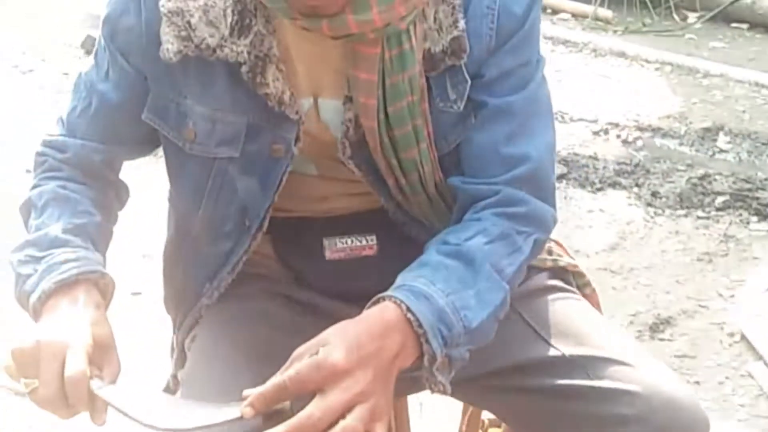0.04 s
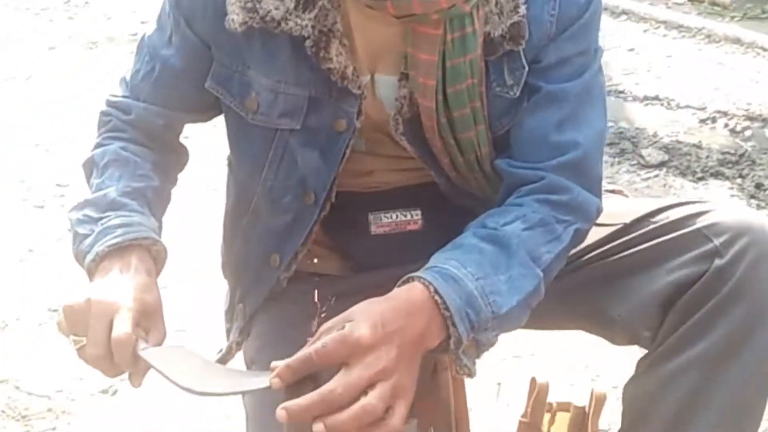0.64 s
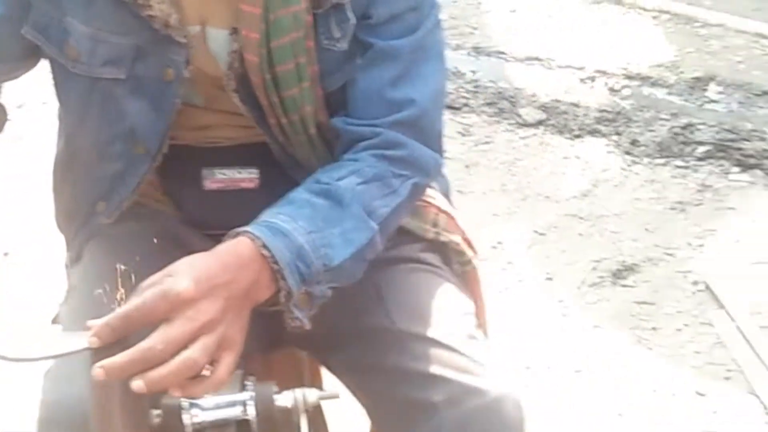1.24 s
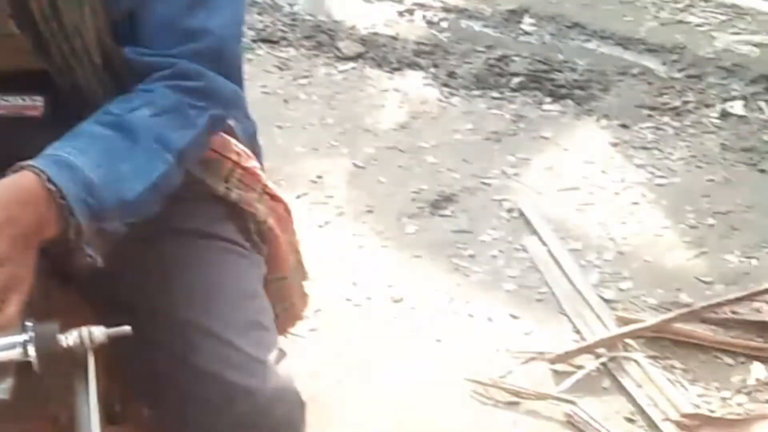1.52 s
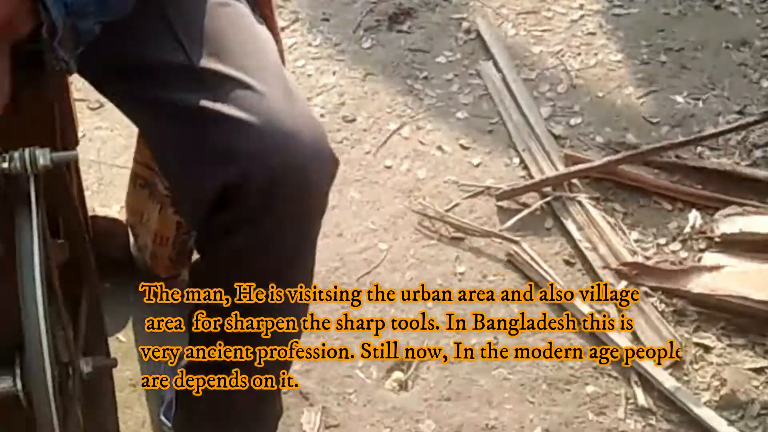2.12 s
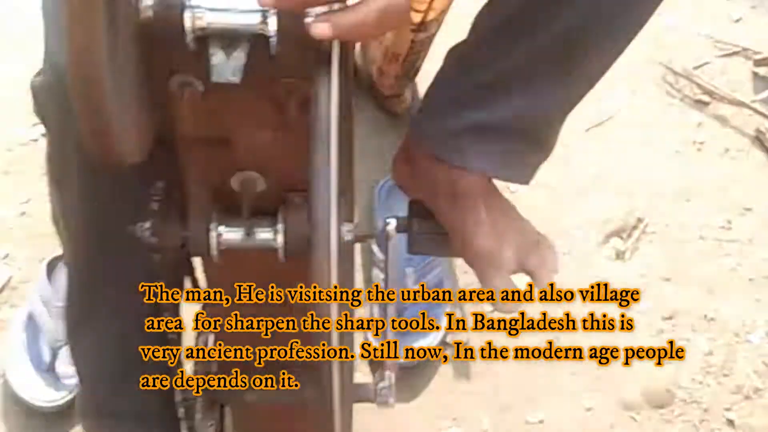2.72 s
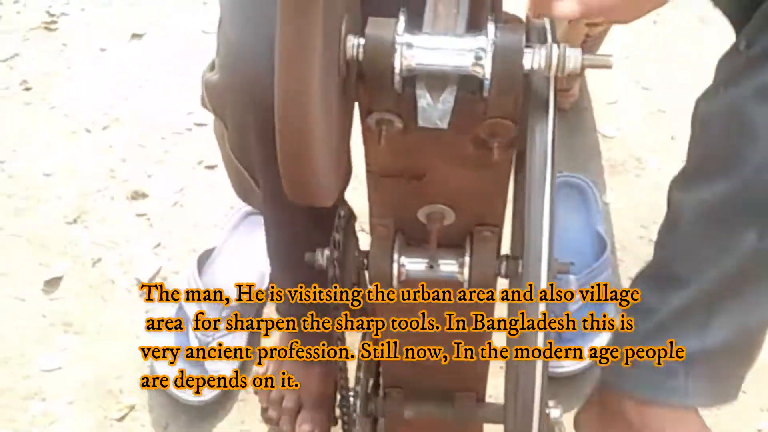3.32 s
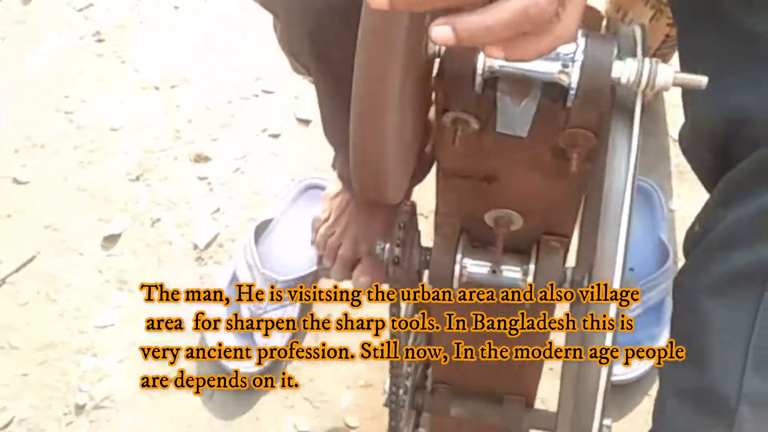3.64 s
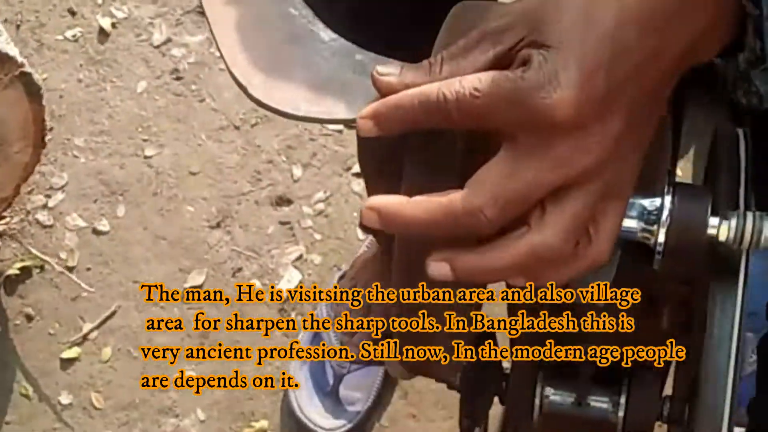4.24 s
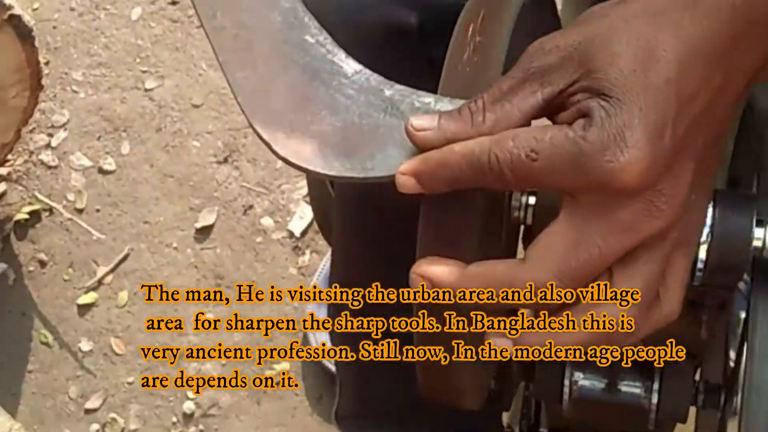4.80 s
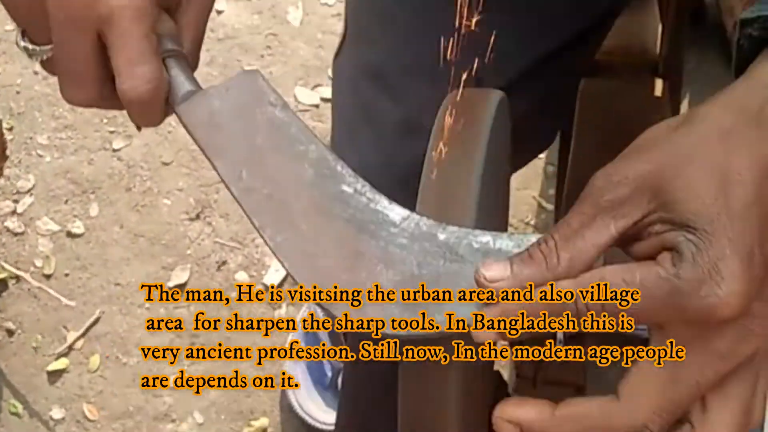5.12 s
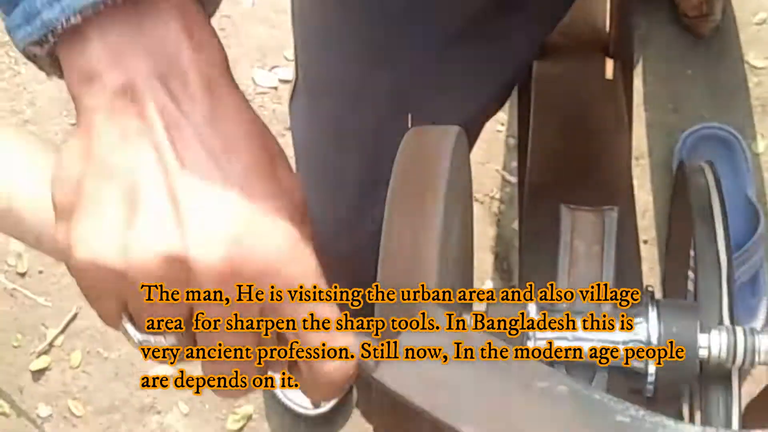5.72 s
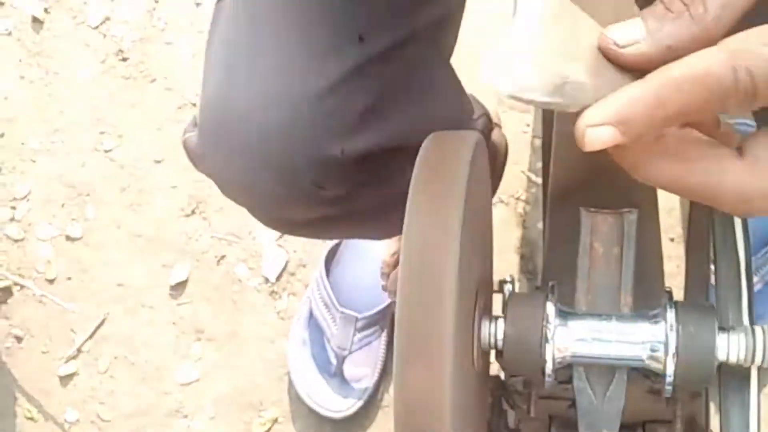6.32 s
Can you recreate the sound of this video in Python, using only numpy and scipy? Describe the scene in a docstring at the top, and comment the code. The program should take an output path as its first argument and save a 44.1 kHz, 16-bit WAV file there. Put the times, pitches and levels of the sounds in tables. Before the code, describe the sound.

A pedal-driven grindstone whirs and rattles close by, outdoors. A steel blade taps the stone a few times, then grinds in a long, gritty pass with a shifting metallic tone. It lifts for about a second while the drive runs on with light knocks. More taps lead into a shorter, louder pass that throbs and judders. The blade comes away, leaving the whir and a few faint squeaks.

```python
"""A curved steel blade is sharpened on a pedal-driven grindstone, outdoors and close by.
Abrasive grains strike the edge and excite bending modes, which swell and glide as the blade is drawn
from heel to tip in two passes. The stone runs slightly out of true, so it first taps the edge, then
grinds with a throb; under the hardest pressure the blade judders and flexes. The drive whirs, rattles
and knocks into its stand, air rumbles faintly, and thin squeaks follow the lifting of the blade."""
import sys
import numpy as np
from scipy import signal
from scipy.fft import rfft, irfft, next_fast_len
from scipy.io import wavfile
from scipy.ndimage import uniform_filter1d

SR = 44100
rng = np.random.default_rng(int(sys.argv[2]) if len(sys.argv) > 2 else 0)


def bounce(signal):
    """Save signal as a 16-bit WAV file at the path given by the first command-line argument."""
    frames = np.transpose(np.atleast_2d(signal))
    limited = np.clip(frames, -1, 1)
    pcm = np.round(limited * 32767).astype(np.int16)
    wavfile.write(sys.argv[1], SR, pcm)


N = 284886
TIME = np.arange(N) / SR
PADDED = next_fast_len(N + SR // 2, real=True)
HZ = np.maximum(np.arange(PADDED // 2 + 1) * SR / PADDED, 1)


def from_db(db):
    """Amplitude ratio of a level in decibels."""
    return np.exp(np.asarray(db) * (np.log(10) / 20))


def rms(x):
    """Root-mean-square amplitude."""
    return np.sqrt(np.mean(x ** 2) + 1e-20)


def running_rms(x, seconds):
    """Rms amplitude in a sliding window."""
    return np.sqrt(np.maximum(uniform_filter1d(x * x, int(seconds * SR)), 1e-20))


def evened(x, seconds):
    """Normalisation that holds the running rms near 1."""
    return x / running_rms(x, seconds)


def in_time(rows):
    """Linear interpolation over time, one curve for each column after the first."""
    times, *columns = np.transpose(rows)
    return [np.interp(TIME, times, column) for column in columns]


def bell(offset, half_width):
    """Gaussian curve that falls to 1/e at the half-width."""
    return np.exp(-np.minimum((offset / half_width) ** 2, 20))


def humps(rows):
    """Sum of Gaussian changes of level, in dB."""
    return sum(db * bell(TIME - centre, half_width) for centre, half_width, db in rows)


def touching(start, end, rise_s, release_s):
    """Contact envelope: linear rise, hold and exponential decay."""
    out, span = np.zeros(N), slice(int(start * SR), int((end + 20 * release_s) * SR))
    rise = np.clip((TIME[span] - start) / rise_s, 0, 1)
    out[span] = rise * np.exp(-np.maximum(TIME[span] - end, 0) / release_s)
    return out


def drift(per_s):
    """Continuous random fluctuation with rms 1."""
    points = rng.standard_normal(N // 8)
    slow = np.interp(TIME * per_s, np.arange(len(points)), points)
    return slow / rms(slow)


def grains(per_s, spread_db):
    """Shot noise: tiny impacts of random timing and size, with rms 1."""
    clicks = (rng.random(N) < per_s / SR) * rng.choice([-1, 1], N)
    clicks = clicks * from_db(spread_db * np.minimum(rng.exponential(1, N), 4))
    return clicks / rms(clicks)


def colour(points):
    """Minimum-phase response through points of (Hz, dB)."""
    hz, db = np.transpose(points)
    cepstrum = irfft(np.log(from_db(np.interp(np.log(HZ), np.log(hz), db))), PADDED)
    cepstrum[1:PADDED // 2] *= 2
    cepstrum[PADDED // 2 + 1:] = 0
    return np.exp(rfft(cepstrum))


def resonances(modes):
    """Response of damped modes in parallel."""
    return sum(from_db(db) / (1 + 1j * (HZ - hz * hz / HZ) / width) for hz, width, db in modes)


def emphasis(modes):
    """Response of resonant peaks in series, each lifting its own band."""
    out = 1
    for hz, width, db in modes:
        detuning, lift = 1j * (HZ - hz * hz / HZ) / width, from_db(db / 2)
        out = out * (detuning + lift) / (detuning + 1 / lift)
    return out


def filtered(x, response):
    """Convolution by multiplication of spectra."""
    return irfft(rfft(x, PADDED) * response, PADDED)[:N]


def through(x, response):
    """Filtering that preserves the overall rms."""
    out = filtered(x, response)
    return out * rms(x) / rms(out)


def band(x, low_hz, high_hz):
    """Steep band-pass filter."""
    return signal.sosfilt(signal.butter(4, [low_hz, high_hz], "band", fs=SR, output="sos"), x)


def gliding(x, hz, width_hz, block=512):
    """Two-pole resonator whose centre moves block by block."""
    out, state, r = np.zeros(N), np.zeros(2), np.exp(-np.pi * width_hz / SR)
    zeros = [(1 - r * r) / 2, 0, (r * r - 1) / 2]
    for i in range(0, N, block):
        poles = [1, -2 * r * np.cos(2 * np.pi * hz[i] / SR), r * r]
        out[i:i + block], state = signal.lfilter(zeros, poles, x[i:i + block], zi=state)
    return out


def moving_peak(x, hz, width_hz, boost_db, block=512):
    """Peak or notch whose centre and height move block by block."""
    out, state, damping = np.zeros(N), np.zeros(2), np.pi * width_hz / SR
    centres = np.clip(np.broadcast_to(hz, N)[::block], 20, .45 * SR)
    lifts = from_db(np.broadcast_to(boost_db, N)[::block] / 2)
    for i, centre, lift in zip(range(0, N, block), centres, lifts):
        tuning = -2 * np.cos(2 * np.pi * centre / SR)
        zeros = [1 + damping * lift, tuning, 1 - damping * lift]
        poles = [1 + damping / lift, tuning, 1 - damping / lift]
        out[i:i + block], state = signal.lfilter(zeros, poles, x[i:i + block], zi=state)
    return out


def scatter(x, t60, low_hz, high_hz, delay_s=.005):
    """Diffuse reverberation: convolution with exponentially decaying noise."""
    decay = from_db(-60 * np.minimum(TIME / t60, 10)) * (TIME > delay_s)
    tail = band(rng.standard_normal(N), low_hz, high_hz) * decay
    return through(x, rfft(tail, PADDED))


def shimmer(grit, low_hz=1500, t60=.039, per_s=7):
    """Dense, short-lived resonances swell and fade as the point of contact wanders."""
    return grit + sum(.4 * drift(per_s) * scatter(grit, t60, low_hz, 15000, delay_s=0) for _ in range(4))


# Rotation of the stone. Each row: time in seconds, speed in turns per second.
WHEEL_SPEED = [(0, 27.47), (.25, 24.84), (.55, 22.74), (.9, 23.09), (1.3, 24.0), (1.8, 22.08), (2.3, 20.73),
               (2.75, 19.1), (3.3, 16.1), (3.9, 19.1), (4.5, 19.08), (4.95, 19.47), (5.25, 18.45),
               (5.85, 17.3)]

def wheel_turns():
    """Rotation angle in turns, the integral of speed."""
    return np.cumsum(in_time(WHEEL_SPEED)[0]) / SR


# The whir swells or fades. Each row: time and half-width in seconds, change in dB.
DRIVE_SWELLS = [(.285, .044, 6), (.57, 0.048, 3.5), (1.05, 0.24, -2), (1.52, 0.16, 1), (2.2, 0.87, 2.5),
                (3.2, 0.074, -1.5), (3.62, 0.17, 4), (4.08, 0.16, 1.5), (4.55, .07, 5.5), (5.88, 0.067, -9),
                (6.37, 0.11, 3)]

def whir_level(full_db=-33, full_turns_per_s=21.1, db_per_doubling=36.5, push_db=1.5):
    """Machine noise, in dB, grows with speed up to a limit and surges with each pedal stroke."""
    slowness = np.minimum(np.log2(in_time(WHEEL_SPEED)[0] / full_turns_per_s), 0)
    push = np.cos(2 * np.pi * (wheel_turns() - .72) / 6.85)  # one stroke every 6.85 turns
    return full_db + db_per_doubling * slowness + push_db * push + humps(DRIVE_SWELLS)


# Spectral envelope of the drive. Each row: frequency in Hz, relative level in dB.
WHIR_SPECTRUM = [(290, -60.5), (500, -34.5), (777, -4.5), (1130, -12), (1230, -22.5), (1390, -17.5),
                 (1580, -14), (1850, -18), (2760, -22.5), (3180, -38), (3940, -29.5), (5230, -38),
                 (7910, -33.5), (12300, -38), (15000, -63)]
# Modes of the stand's housing. Each row: frequency and bandwidth in Hz, height in dB.
HOUSING_MODES = [(588.4, 45, 16), (765, 110, 3.5), (896, 32, 13), (1246, 36, 9.5), (1460, 140, -13),
                 (1868, 52, 4.5), (2200, 91, 0)]
# Moving peak of the whir. Each row: time in seconds, centre in Hz.
WHIR_CENTRE = [(0, 810), (.18, 780), (.28, 886), (1.9, 837), (2.3, 793), (3.3, 808), (3.6, 740), (4.3, 866),
               (6.0, 797), (6.46, 836)]
# Rattle of the chain near 2 kHz. Each row: time in seconds, boost over the whir in dB.
CHAIN_BOOST = [(0, 2.5), (.2, 7), (.5, 3.5), (3.15, -2.5), (3.3, -1), (3.6, -3), (3.85, 4.5), (6.0, -1.5),
               (6.28, 7.5), (6.46, 5)]

def drive_whir(stand):
    """Forced vibration: small impacts in the bearings and chain excite the stand."""
    impacts = shimmer(grains(per_s=2700, spread_db=3), low_hz=474, t60=.049, per_s=16)
    flicker_db = 1.9 * drift(70) + .33 * drift(13)
    rattle = through(impacts * from_db(flicker_db), stand)
    rattle = moving_peak(rattle, in_time(WHIR_CENTRE)[0], width_hz=120, boost_db=6)
    rattle = moving_peak(rattle, hz=1970, width_hz=1200, boost_db=in_time(CHAIN_BOOST)[0])
    return from_db(whir_level()) * evened(rattle, .2)


# Low modes of the stand's frame. Each row: frequency and bandwidth in Hz, height in dB.
FRAME_MODES = [(289.5, 17, 8.5), (325, 44, 1), (419.5, 23, 9.5), (487, 280, -17.5)]
# Strength of the drone. Each row: time in seconds, level in dB.
DRONE_LEVEL = [(0.0, -49.5), (0.29, -60), (0.47, -49.5), (1.78, -47), (1.82, -41), (2.68, -47.5),
               (2.9, -43.5), (3.0, -53), (4.17, -52.5), (4.39, -43), (4.97, -54), (5.56, -43),
               (5.83, -61.5), (6.46, -57.5)]

def stand_drone():
    """Resonance: the frame's low modes turn random impacts into a drone."""
    frame = resonances(FRAME_MODES) * colour([(100, -14.5), (250, -2.5), (500, 0), (1200, -2.5)])
    drone = through(grains(per_s=3600, spread_db=8.5), frame)
    return from_db(in_time(DRONE_LEVEL)[0]) * evened(drone, 1)


# Spectral envelope of moving air. Each row: frequency in Hz, relative level in dB.
AIR_SPECTRUM = [(20, -38), (45, -4), (68, -1), (105, -8), (160, -7), (250, -24), (600, -36.5), (3000, -74)]
# Puffs of air. Each row: time and half-width in seconds, level in dB.
AIR_PUFFS = [(2.057, 0.013, -44), (2.144, 0.027, -36), (2.24, 0.11, -49), (5.578, 0.046, -52),
             (5.861, 0.019, -55.5)]

def air_rumble(blade, steady_db=-70.5, relative_to_blade_db=-46):
    """Flow noise and its puffs add in power to a rumble that follows the grinding."""
    puffs = sum(from_db(db) * bell(TIME - centre, half_width) for centre, half_width, db in AIR_PUFFS)
    level = np.hypot(from_db(steady_db) + puffs, from_db(relative_to_blade_db) * running_rms(blade, .1))
    return level * evened(through(rng.standard_normal(N), colour(AIR_SPECTRUM)), .091)


# Spectral envelope of the grinding. Each row: frequency in Hz, relative level in dB.
GRIND_SPECTRUM = [(900, -7), (1100, -7.5), (1400, -11), (1900, -3.5), (2600, -11), (3300, -10.5),
                  (4100, -11.5), (5100, -9), (5800, -20.5), (7500, -13.5), (9000, -15), (10000, -15),
                  (12500, -21.5), (15000, -23)]
# Blade modes damped by the fingers. Each row: frequency and bandwidth in Hz, height in dB.
DAMPED_MODES = [(2010, 130, 9), (2260, 180, 2.5), (2613, 160, 8), (3636, 180, 4.7), (4687, 160, 8),
                (4784, 190, 6), (4970, 430, 3.9), (6030, 442, 6.5), (6450, 560, 5.5), (7250, 490, 6.5),
                (7620, 230, 5), (8610, 590, 8.5), (10800, 210, 13), (11400, 280, 7.5), (12860, 110, 4),
                (13350, 660, 15), (14134, 190, 18), (15000, 630, 11.5)]
# Lightly damped modes that sing on after the blade lifts, with the same columns.
RINGING_MODES = [(1690, 7, -7), (3410, 11, -2), (4640, 10, -9), (7264, 10, -2), (7359, 8, -6),
                 (8829, 10, -9), (10760, 14, -9), (11870, 18, -3)]

def steel_response():
    """Transfer function of the blade: the narrower a mode, the longer it rings."""
    return colour(GRIND_SPECTRUM) * emphasis(DAMPED_MODES) * (1 + resonances(RINGING_MODES))


# Touches of the stone's high spot. Each row: start and duration in seconds, level in dB.
HIGH_SPOT_TOUCHES = [(.26, .015, -30.5), (.3, .018, -28.5), (.341, .017, -26.5), (.374, .032, -26),
                     (3.911, .01, -24), (4.015, .013, -21.5), (4.121, .013, -21.5), (4.175, .016, -21.5),
                     (4.221, .022, -20.5)]

def grazes(steel):
    """Intermittent contact: only the high spot scrapes the edge as the blade is lowered."""
    force = sum(from_db(db) * touching(start, start + length, rise_s=.0012, release_s=.0035)
                for start, length, db in HIGH_SPOT_TOUCHES)
    light_touch = colour([(500, -25.5), (1200, -3.5), (1900, -.5), (3200, -1), (5000, 5.5),
                          (6000, 3), (8000, 0), (11000, 3.5), (15000, -12)])
    return through(grains(per_s=23000, spread_db=5) * force, steel * light_touch)


# Reflection from the tip. Each row: place from heel 0 to tip 1, delay in seconds, amplitude ratio.
TIP_REFLECTION = [(0, .0016, .12), (.6, .00115, .25), (.8, .00092, .5), (1, .00074, .35)]

def tip_echo(grit, place):
    """Short waves return sooner as the tip nears; added to the direct wave they form a rising comb."""
    places, delays, ratios = np.transpose(TIP_REFLECTION)
    delayed = np.interp(TIME - np.interp(place, places, delays), TIME, band(grit, 5500, 15000))
    return np.interp(place, places, ratios) * delayed


# Path of the contact in each pass. Each row: time in seconds, place from heel 0 to tip 1.
FIRST_PATH = [(.42, .008), (3.15, .98)]
SECOND_PATH = [(4.26, 0.22), (4.651, 0.22), (4.8, 0.35), (5.051, 0.45), (5.25, 0.66), (5.42, 0.834),
               (5.53, 0.874), (5.7, 0.938), (5.821, 1)]
# Bending modes. Each row: place and reach in blade lengths, frequency there and bandwidth in Hz,
# glide in octaves per blade length, boost in dB in the first pass and in the more firmly held second.
BENDING_MODES = [(0.002, 0.217, 1946, 102, -0.12, -12.0, 19.0), (0.058, 0.17, 1829, 463, -0.76, 11.2, 19.0),
                 (0.105, 0.159, 7542, 744, -0.08, 6.5, 18.1), (0.168, 0.136, 9124, 976, -0.23, 10.8, 8.4),
                 (0.172, 0.197, 5326, 1223, 0.04, 16.6, 12.1),
                 (0.232, 0.205, 11122, 957, -0.17, 13.6, 16.5), (0.28, 0.07, 1412, 215, -0.66, 12.6, -4.5),
                 (0.302, 0.182, 3614, 1091, 0.68, 4.7, 14.4), (0.307, 0.242, 6235, 376, -0.67, 13.3, 9.2),
                 (0.323, 0.154, 4725, 702, 0.77, 10.5, 6.7), (0.408, 0.222, 2743, 533, 0.27, 18.2, 15.7),
                 (0.41, 0.058, 8614, 2245, -0.87, 9.1, 8.0), (0.45, 0.2, 1950, 400, 0, 0, -4),
                 (0.471, 0.08, 6205, 804, -0.28, 17.9, 12.9), (0.54, 0.333, 4798, 931, 0.03, -12.0, 3.6),
                 (0.555, 0.148, 4071, 659, -1.14, 13.0, 0.9), (0.559, 0.142, 2684, 154, -0.22, -12.0, 11.7),
                 (0.57, 0.137, 3577, 296, -0.4, -7.3, 14.4), (0.603, 0.168, 3118, 399, 0.05, 16.1, 19.0),
                 (0.603, 0.333, 1148, 257, -0.08, -10.6, 16.9), (0.604, 0.251, 1674, 327, 0.61, 10.9, 11.9),
                 (0.639, 0.172, 11141, 985, 0.33, 10.5, 19.0), (0.698, 0.051, 2686, 870, -2.0, 17.1, 8.4),
                 (0.717, 0.082, 6098, 1048, -0.29, 19.0, 17.7), (0.803, 0.268, 2876, 177, -0.0, -5.6, 5.4),
                 (0.833, 0.098, 3761, 426, 0.51, 19.0, 9.9), (0.835, 0.067, 4169, 279, -0.03, 19.0, 11.5),
                 (0.86, 0.05, 14200, 400, 0, 3, 11), (0.885, 0.03, 4780, 350, 1.5, 10, 0),
                 (0.886, 0.06, 1277, 425, -1.51, 23, 19.0), (0.888, 0.204, 2844, 408, 2.0, 19.0, 7.6),
                 (0.897, 0.03, 6294, 2095, 2.0, 10.2, 14.9), (0.906, 0.077, 3148, 491, 1.19, 21, 17.7),
                 (0.917, 0.031, 2220, 224, -2.0, 19.0, 0.5), (0.917, 0.079, 2235, 744, 0.32, -4.6, 14.1),
                 (0.935, 0.035, 10850, 300, -0.2, 9, 0), (0.935, 0.107, 10826, 399, 0.02, 15, 13),
                 (0.956, 0.03, 5382, 1502, -2.0, 8.5, 19.0), (0.98, 0.025, 14200, 300, 0, 5, 13),
                 (1.0, 0.186, 9201, 3063, 0.6, 15, 9.0)]

def bending_waves(grit, tremble_octaves=.008, tremble_db=1, tremble_per_s=12):
    """Modal coupling depends on the contact point: each mode speaks or is choked near one place."""
    place, = in_time([*FIRST_PATH, *SECOND_PATH])
    second_pass = TIME > CONTACT_SPANS[0][1] + .5
    out = grit + tip_echo(grit, place)
    waver = tremble_octaves * drift(tremble_per_s)  # the hands tremble
    for mode_place, reach, hz, width_hz, glide, first_db, second_db in BENDING_MODES:
        past = place - mode_place
        boost_db = np.where(second_pass, second_db, first_db) + tremble_db * drift(tremble_per_s)
        out = moving_peak(out, hz * np.exp2(glide * past + waver), width_hz, boost_db * bell(past, reach))
    return out


# Profile of the rim. Each row: angle in turns, height from the high spot 0 to the lowest -1.
RIM_PROFILE = [(0, 0), (.2, -.1), (.33, -.75), (.46, -1.0), (.53, -.45), (.65, -.6), (.75, -.85),
               (.81, -.05)]
# The blade bounces on the rim. Each row: start in seconds, extra throb in dB, settling time in seconds.
BLADE_BOUNCES = [(.415, 8.5, 1.0), (2.209, 6, .6), (4.264, 17, .36)]
# The two passes. Each row: start and end of contact in seconds.
CONTACT_SPANS = [(0.412, 3.1474), (4.261, 5.819)]

def contact_force(settled_throb_db=.5, rough_db=.5, chatter_db=1.46):
    """Amplitude modulation: the rim's shape and rough patches recur each turn under random chatter."""
    turns = wheel_turns()
    height = np.interp(turns, *np.transpose(RIM_PROFILE), period=1)
    throb_db = settled_throb_db + sum(db * (TIME > start) * np.exp(-np.abs(TIME - start) / settle_s)
                                      for start, db, settle_s in BLADE_BOUNCES)
    spots = rng.standard_normal(14)
    spots -= uniform_filter1d(spots, size=5, mode="wrap")
    patches = np.interp(turns, np.arange(len(spots)) / len(spots), spots, period=1)
    force_db = throb_db * height + rough_db * patches + chatter_db * drift(200) + judder()
    contact = sum(touching(start, end, rise_s=.0038, release_s=.0057) for start, end in CONTACT_SPANS)
    return evened(from_db(force_db), .4) * contact


# Lower edge of the rasp, its boundary with the treble, and upper edge of the treble, in Hz.
GRIND_BANDS_HZ = [900, 4300, 16000]
# The long first pass and the harder second. Each row: time in seconds, rasp and treble levels in dB.
FIRST_LEVELS = [(0.42, -26.5, -24.5), (0.55, -28.5, -25.5), (0.999, -31.5, -26), (1.35, -23.5, -24.5),
                (1.68, -33.5, -31), (1.9, -32, -39.5), (1.97, -30, -34.5), (2.16, -31.5, -36),
                (2.28, -22.5, -32), (2.44, -27, -32.5), (2.75, -20, -27), (2.9, -21, -26.5),
                (3.02, -21, -18.5), (3.141, -23.5, -16)]
SECOND_LEVELS = [(4.27, -25, -24), (4.45, -24, -24.5), (4.652, -26.5, -21.5), (4.82, -18.5, -16.5),
                 (5.05, -15.5, -21), (5.218, -13, -19.5), (5.35, -17, -17.5), (5.46, -13.5, -21.5),
                 (5.559, -13, -20), (5.739, -17.5, -20), (5.808, -22, -17)]

def grinding(steel):
    """Abrasion: grains tear at the edge; pressure and angle set how dark or bright the steel sounds."""
    grit = bending_waves(shimmer(grains(per_s=18000, spread_db=3)))
    levels_db = in_time([*FIRST_LEVELS, *SECOND_LEVELS])
    rubbing = 0
    for low, high, level_db in zip(GRIND_BANDS_HZ, GRIND_BANDS_HZ[1:], levels_db):
        passband = 1 / (1 + (low / HZ) ** 12) - 1 / (1 + (high / HZ) ** 12)
        part = filtered(grit, passband)
        rubbing += part * from_db(level_db) / running_rms(filtered(part, steel), .046)
    return filtered(rubbing * contact_force(), steel)


# Knocks of the pedal drive. Each row: start in seconds, relative level in dB.
SLACK_KNOCKS = [(2.043, -16), (2.057, -17), (3.298, -34), (3.486, -33), (3.549, -24), (3.686, -30),
                (3.891, -23.5), (6.287, -35)]

def drive_knocks(stand, gain_db=-4):
    """Impact excitation: slack in the drive strikes the stand, which rings briefly."""
    blows = sum(from_db(db + gain_db) * touching(start, start + .00093, rise_s=.001, release_s=.0078)
                for start, db in SLACK_KNOCKS)
    return band(through(blows * rng.standard_normal(N), stand), 300, 2400)


# Spells of judder under load. Each row: time and half-width in seconds, swing in dB.
JUDDER_SPELLS = [(5.21, 0.38, 3), (5.48, 0.15, 1)]
# The edge all but loses the stone. Each row: time and half-width in seconds, change in dB.
EDGE_SKIPS = [(5.293, .004, -6.5), (5.342, .005, -6), (5.758, .012, -5.5)]

def judder(bounce_hz=118.8, wander=.16):
    """Fast, unsteady bouncing and brief skips of the edge modulate the contact force, in dB."""
    cycles = np.cumsum(bounce_hz * np.exp(wander * drift(40))) / SR
    return np.cos(2 * np.pi * cycles) * humps(JUDDER_SPELLS) + humps(EDGE_SKIPS)


# The whole blade flexes under the hardest pressure. Each row: time in seconds, pitch in Hz, level in dB.
FLEX_NOTE = [(5.1, 278, -85.5), (5.25, 280, -40.5), (5.36, 300, -43), (5.5, 427, -56), (5.62, 532, -44.5),
             (5.71, 596, -36.5), (5.81, 570, -50), (5.85, 562, -99)]

def blade_flex(width_hz=55):
    """The fundamental bending mode, driven by noise, rises in pitch as the tip is reached."""
    hz, level_db = in_time(FLEX_NOTE)
    note = gliding(gliding(rng.standard_normal(N), hz, width_hz), hz, width_hz)
    return from_db(level_db) * evened(note, .069)


# Thin tones: the lifted blade chimes near 5.9 s, then a brief thin hum sounds. Each row: time and half-width in
# seconds, frequency in Hz, level in dB.
SQUEAK_NOTES = [(5.885, .035, 1351, -53), (5.905, .04, 1690, -51), (5.92, .03, 1007, -48),
                (6.38, .025, 613, -39)]

def squeaks(flutter_radians=.5):
    """Random phase modulation makes thin, nearly pure tones waver as they swell and fade."""
    out = np.zeros(N)
    for centre, half_width, hz, db in SQUEAK_NOTES:
        tone = np.sin(2 * np.pi * hz * TIME + flutter_radians * drift(120))
        out += from_db(db) * bell(TIME - centre, half_width) * tone
    return out


def scene():
    """Superposition of the sources, nearly mono: only scattered treble differs between the sides."""
    steel = steel_response()
    stand = colour(WHIR_SPECTRUM) * (1 + resonances(HOUSING_MODES))
    blade = grinding(steel) + grazes(steel)
    echo = from_db(-25) * scatter(blade, t60=.22, low_hz=900, high_hz=13000)
    side = from_db(-16) * scatter(band(blade, 5500, 13000), t60=.02, low_hz=5000, high_hz=13000)
    mid = blade + echo + blade_flex()
    mid += drive_whir(stand) + stand_drone() + drive_knocks(stand)
    mid += squeaks() + air_rumble(blade)
    return np.array([mid + side, mid - side])


def record(dry, ceiling=.85, cutoff_hz=15400):
    """Soft saturation rounds the highest peaks, and a steep low-pass cuts the top."""
    rounded = dry / (1 + (dry / ceiling) ** 4) ** (1 / 4)
    return signal.sosfilt(signal.ellip(10, .2, 80, cutoff_hz, fs=SR, output="sos"), rounded)


dry = scene()
out = record(dry)
bounce(out)
```